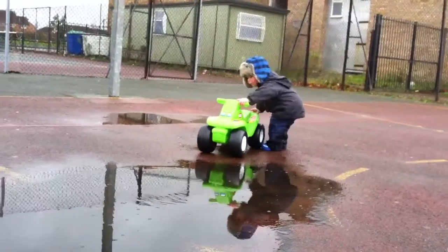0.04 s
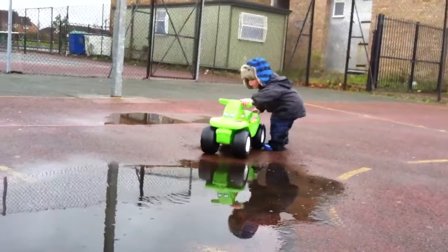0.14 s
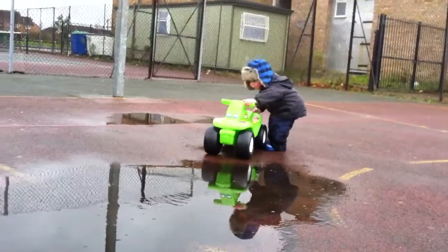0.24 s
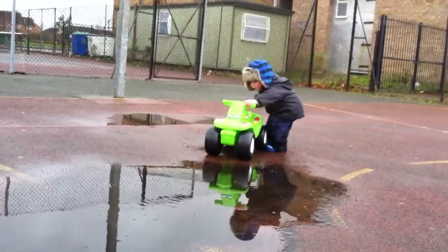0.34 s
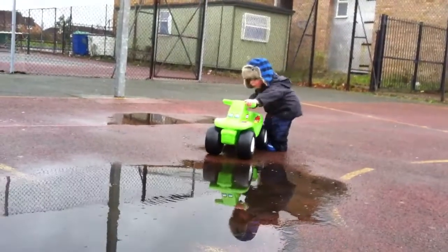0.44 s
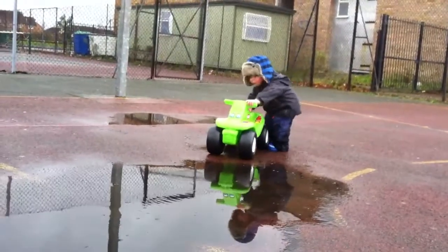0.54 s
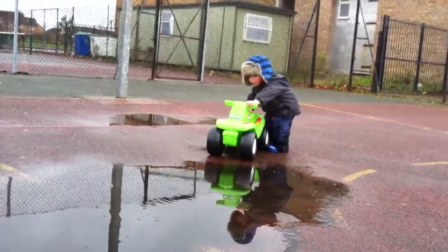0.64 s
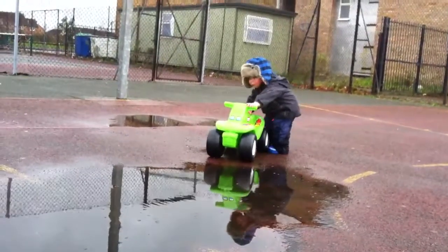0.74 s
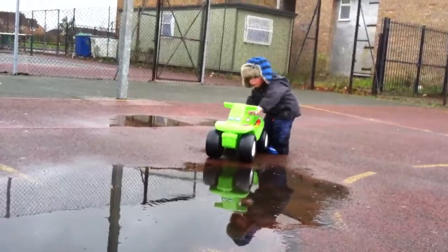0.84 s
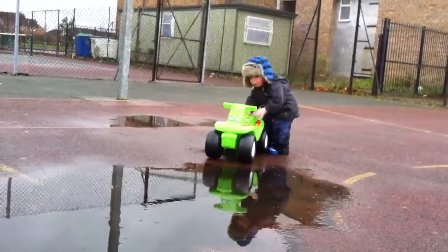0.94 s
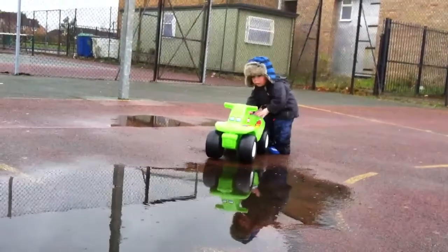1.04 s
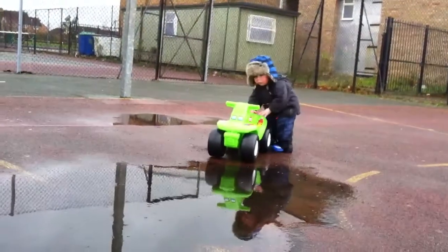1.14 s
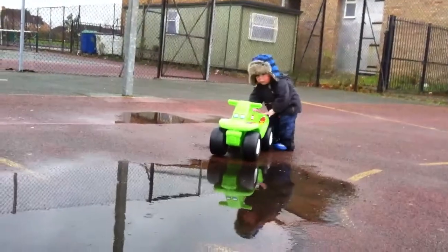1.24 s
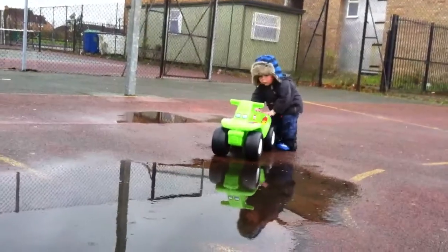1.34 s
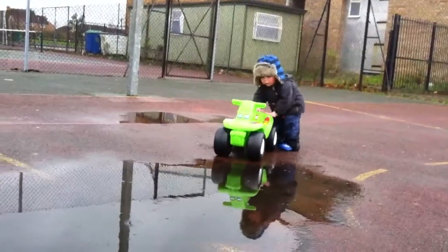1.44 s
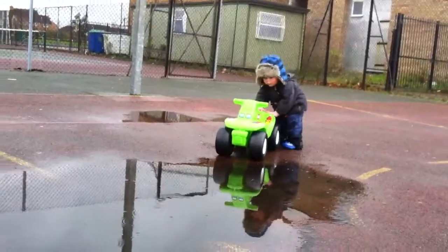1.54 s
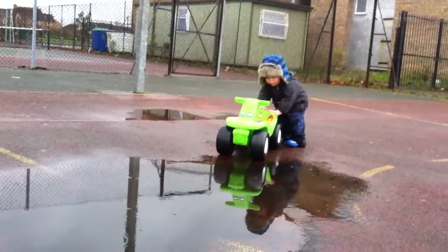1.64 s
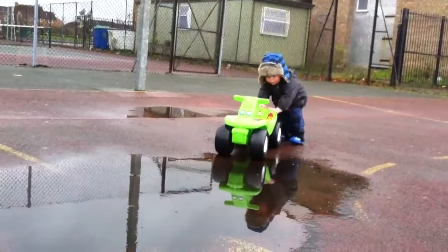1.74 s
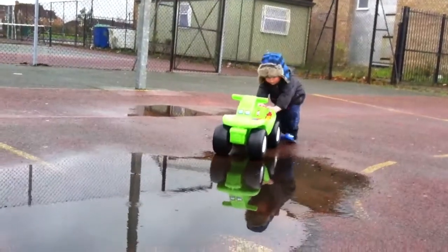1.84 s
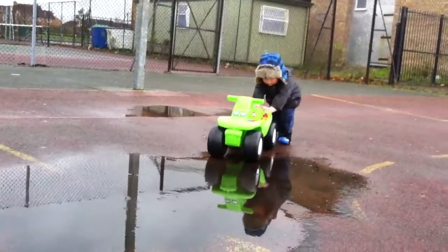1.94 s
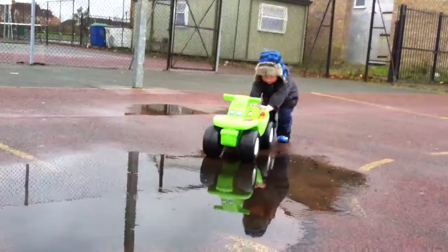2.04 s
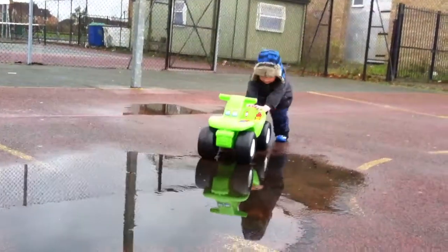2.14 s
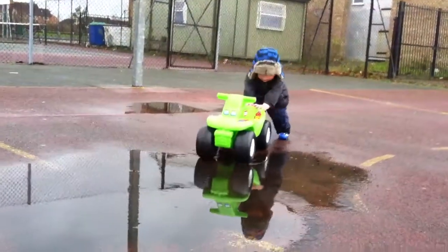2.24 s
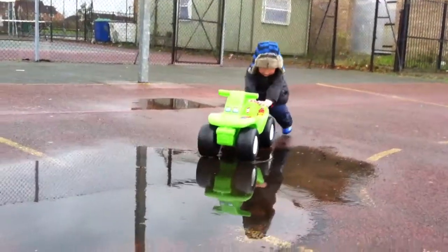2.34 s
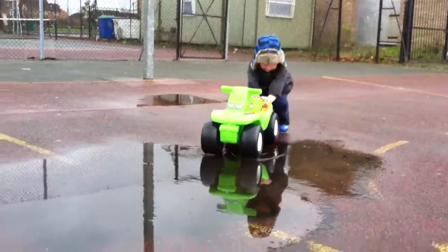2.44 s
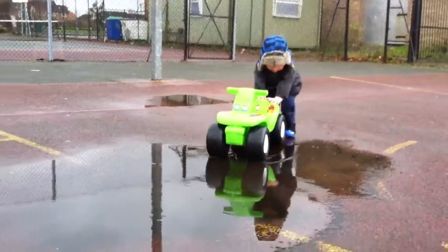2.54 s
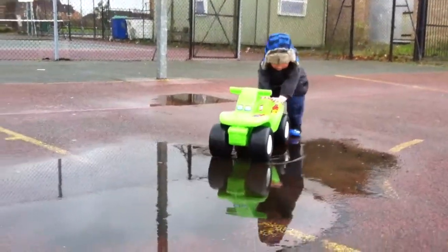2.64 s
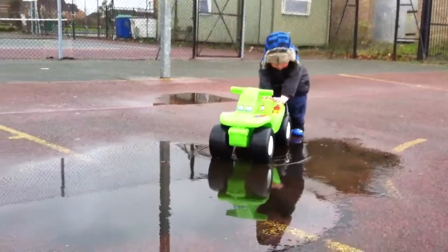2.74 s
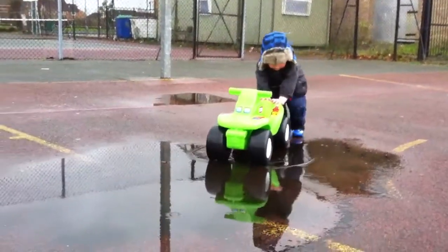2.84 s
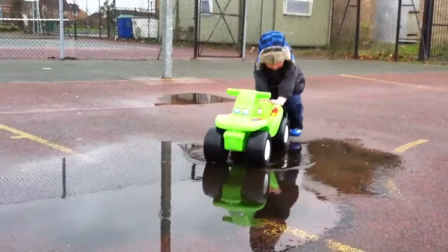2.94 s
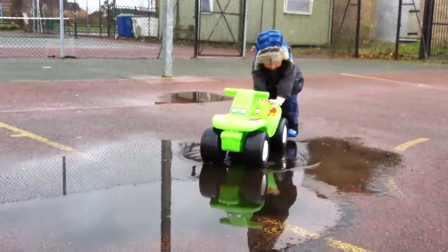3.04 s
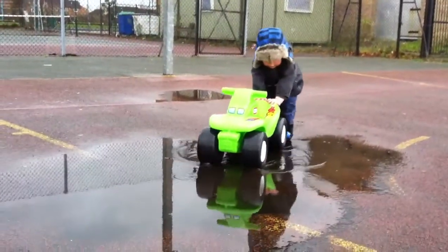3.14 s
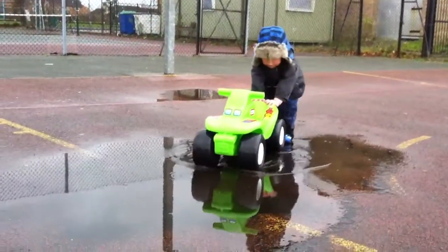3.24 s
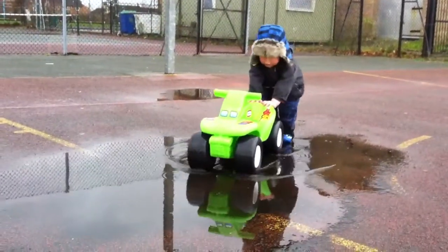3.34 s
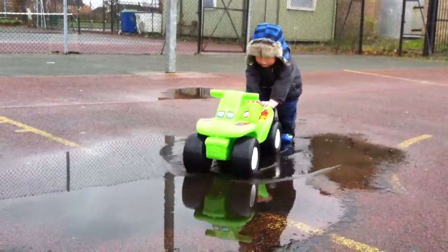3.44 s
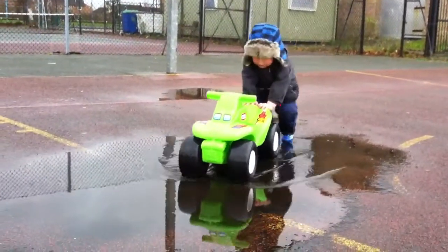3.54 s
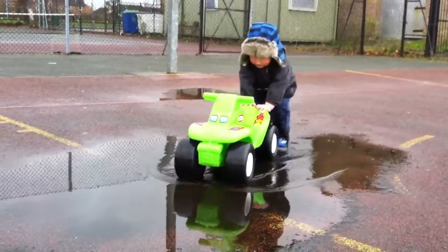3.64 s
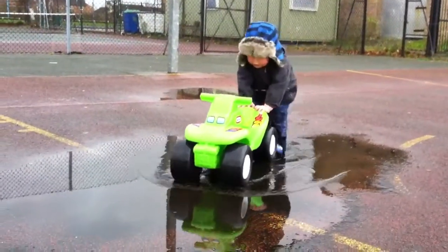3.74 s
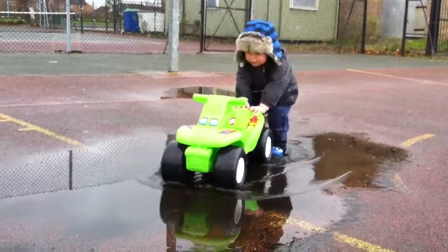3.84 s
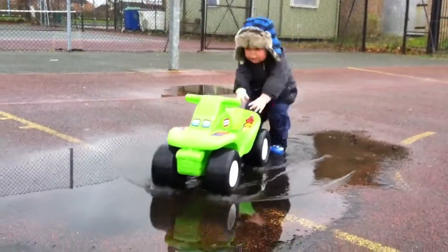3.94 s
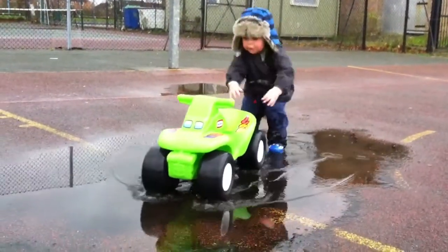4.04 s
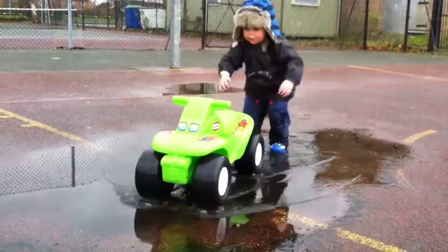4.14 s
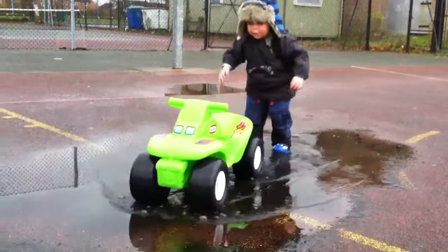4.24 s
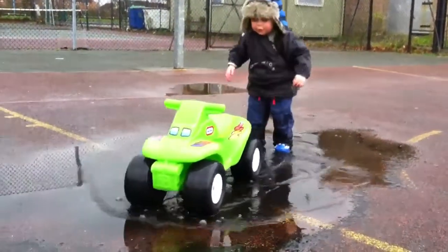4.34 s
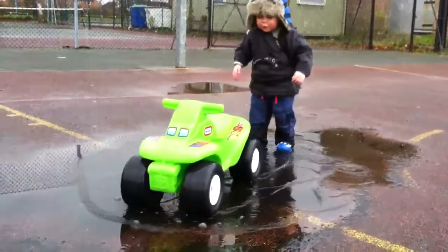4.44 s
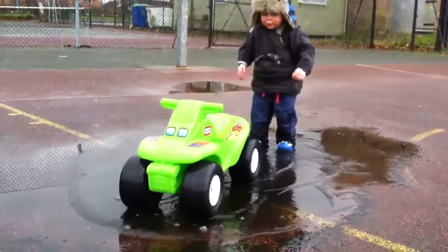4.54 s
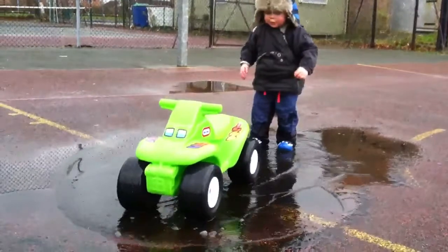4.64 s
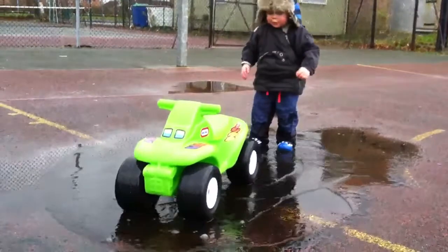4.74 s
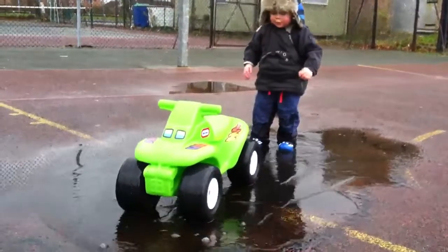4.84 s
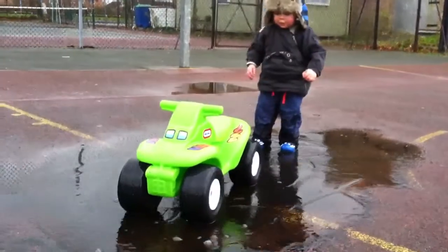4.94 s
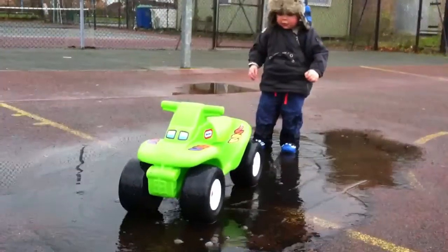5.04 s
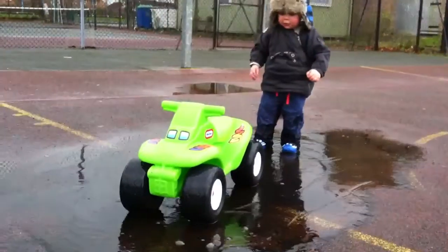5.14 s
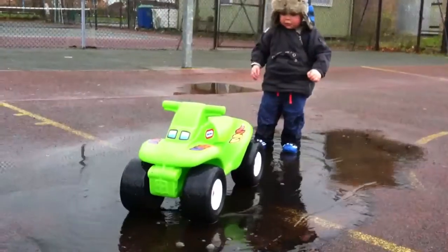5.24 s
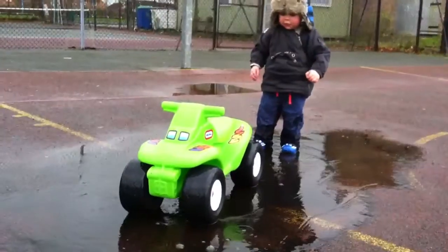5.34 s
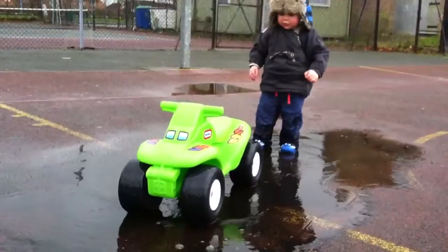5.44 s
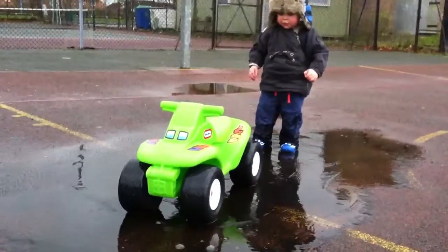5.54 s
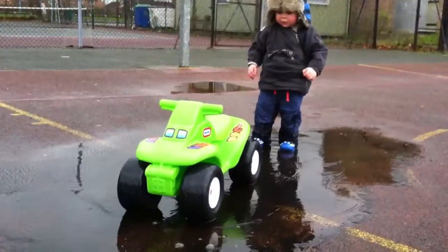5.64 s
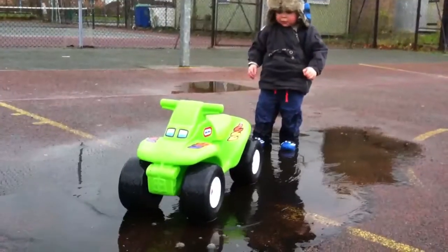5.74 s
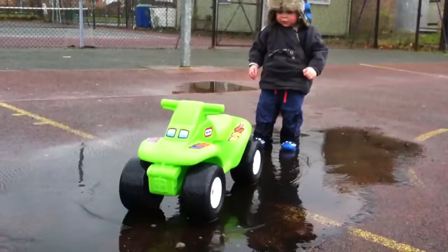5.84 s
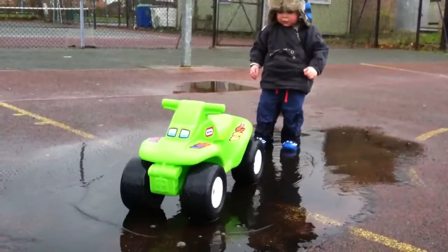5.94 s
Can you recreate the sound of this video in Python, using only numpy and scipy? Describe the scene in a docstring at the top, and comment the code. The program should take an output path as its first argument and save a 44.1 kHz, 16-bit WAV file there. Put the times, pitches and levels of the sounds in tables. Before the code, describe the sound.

On an open outdoor court, a hollow plastic ride-on toy gets a brief rattling shove, then nearly stops with faint gritty scrapes. Sharp clacks begin a longer push, drumming and knocking louder on wet ground into a shallow puddle, with fizz and a few plops. It stops, leaving far traffic. Light wind bumps the microphone.

```python
"""Hard wheels of a hollow plastic ride-on toy drum on wet tarmac as a child pushes it into a shallow puddle.
Random grains drive everything that rolls: they ring resonances of body, air and panels, and crunch as wet grit.
Loose axles clack and the shell knocks, as flurries of contacts and decaying modes; the puddle is rising bubbles.
Light wind bumps the microphone as low swings; far traffic and a faint bird are filtered noise."""
import sys
import numpy as np
from scipy import signal
from scipy.fft import rfft, irfft, next_fast_len
from scipy.io import wavfile

SR = 44100
rng = np.random.default_rng(int(sys.argv[2]) if len(sys.argv) > 2 else 0)


def file_out(sig):
    """Save sig as 16-bit WAV at sys.argv[1]."""
    # one column per channel
    cols = np.atleast_2d(sig).T
    # limit, then scale
    lim = np.clip(cols, -1, 1)
    pcm = np.round(lim * 32767).astype(np.int16)
    wavfile.write(sys.argv[1], SR, pcm)


N = 264159
T = np.arange(N) / SR

# plastic shell resonances: [centre_hz, width_hz, level_db]
BODY_MODES = [(300, 330, -10), (408.7, 39.5, 5), (469, 43, -2), (610, 28.4, 2.5), (676, 63, -0.5),
              (914, 86, -9.5), (1153, 530, -18.5), (1240, 110, -19), (1623, 32, -14.5), (1660, 690, -17),
              (2243, 25, -13)]
# resonances of the air inside: [centre_hz, width_hz, level_db]
CAVITY_MODES = [(163, 27.7, 2.8), (254, 28, 6.5), (307.3, 26, 1.9)]
# panel resonances: [centre_hz, width_hz, level_db]
PANEL_MODES = [(1110, 260, -15), (1580, 36, 7), (1770, 55, -1.5), (2010, 90, -1.5), (2220, 90, -2),
               (2560, 110, -6), (2921, 45, -7), (3220, 170, -2), (3700, 70, -9), (4040, 150, -4),
               (4680, 100, -11), (5140, 60, -5), (7000, 70, -15)]
# grit spectrum, relative: [freq_hz, density_db]
GRIT_SPECTRUM = [(600, -40), (1500, 27.5), (2500, -18.5), (4000, 7), (7000, 10), (10000, 11.5), (16000, -1)]
# stiff wall at the moment of a blow, relative spectrum: [freq_hz, density_db]
CRACK_SPECTRUM = [(450, -18.5), (900, 6), (1500, 2), (2200, -2.5), (3200, -16), (8000, -29)]
# water stirred in the puddle: [time_s, level_db]
WADING_CURVE = [(2.4, -65), (3.0, -65.5), (3.6, -67.5), (4.0, -59), (4.11, -56), (4.2, -54.5), (4.28, -60),
                (4.45, -60.5), (4.7, -63.5)]
# breeze strength: [time_s, level_db]
BREEZE_CURVE = [(0.0, -68), (0.57, -67.5), (1.5, -73), (1.75, -53.5), (1.95, -55.5), (2.42, -43.5),
                (2.78, -50.5), (3.17, -52.5), (3.69, -43), (3.9, -48.5), (4.06, -38), (4.15, -45),
                (4.65, -56), (5.15, -61), (5.37, -58), (5.68, -64.5), (5.84, -55), (5.99, -53)]


def from_db(db):
    """Decibels to amplitude gain."""
    return 10 ** (np.asarray(db) / 20)


def rms_one(x):
    """Scale to an rms of one."""
    return x / np.sqrt(np.mean(x ** 2) + 1e-20)


def level(rows):
    """A (time_s, level_db) curve as a gain in time, fading out beyond its ends."""
    rows = np.array(rows)
    outside_s = np.maximum(rows[0, 0] - T, 0) + np.maximum(T - rows[-1, 0], 0)
    return from_db(np.interp(T, rows[:, 0], rows[:, 1])) * np.exp(-outside_s / 0.027)


def drift(rate_hz):
    """Random values joined by straight lines; rms 1."""
    knots = rng.standard_normal(4096)
    return rms_one(np.interp(T * rate_hz, np.arange(len(knots)), knots))


def clumping(rate_hz, depth_db):
    """A quickly wandering gain with bounded swings; rms 1."""
    return rms_one(from_db(depth_db * np.clip(drift(rate_hz), -2, 1.5)))


def grains(per_s, spread_db):
    """Tiny contacts at random moments, of very uneven size; rms 1."""
    sizes = from_db(spread_db * np.minimum(rng.exponential(1, N), 4)) * rng.choice([-1, 1], N)
    return rms_one(sizes * (rng.random(N) < per_s / SR))


def moments(per_s, count=200):
    """Irregular times that follow a changing rate."""
    due = np.cumsum(per_s * np.ones(N)) / SR
    turns = np.arange(count) + rng.random(count)
    return np.interp(turns[turns < due[-1]], due, T)


def colour(x, spectrum):
    """Causal minimum-phase filter with the given spectrum; white noise keeps its power."""
    hz, db = np.transpose(spectrum)
    size = 2 * next_fast_len(N // 2 + 4096)
    bins_hz = np.arange(size // 2 + 1) * SR / size
    gain = rms_one(from_db(np.interp(np.log(bins_hz + 1), np.log(hz), db)))
    # fold the cepstrum to its causal half
    cepstrum = irfft(np.log(gain))
    cepstrum[1:size // 2] *= 2
    cepstrum[size // 2 + 1:] = 0
    return irfft(rfft(x, size) * np.exp(rfft(cepstrum)))[:N]


def band(x, hz, width_hz):
    """One two-pole resonance, gain one at its top."""
    r = np.exp(-np.pi * width_hz / SR)
    feedback = [1, -2 * r * np.cos(2 * np.pi * hz / SR), r * r]
    return signal.lfilter(np.array([1, 0, -1]) * (1 - r * r) / 2, feedback, x + 1e-18)


def resonate(x, modes, vary_db):
    """Parallel resonances whose shares shift with the point of contact; white noise keeps its power."""
    out = np.zeros(N)
    for k, (hz, width_hz, db) in enumerate(modes):
        share = from_db(db + vary_db * drift(25))
        out += band(x * share, hz, width_hz) * (-1) ** k
    power = sum(from_db(db) ** 2 * np.pi * width_hz / SR for hz, width_hz, db in modes)
    return out / np.sqrt(power)


def soften(x, hz, kind):
    """A gentle second-order low-pass or high-pass."""
    return signal.sosfilt(signal.butter(2, hz, kind, fs=SR, output="sos"), x + 1e-18)


def add(out, start_s, sound):
    """Mix a sound in at its start time."""
    start = int(np.clip(start_s * SR, 0, N - 1))
    out[start:start + len(sound)] += sound[:N - start]


def chatter(contacts, start_s, decay_s, rise_s, hardest):
    """Hard parts bounce in a dying flurry; the hardest contact takes a share of the energy."""
    t = T[:SR // 10]
    envelope = (1 - np.exp(-t / rise_s)) * np.exp(-t / decay_s)
    excerpt = np.roll(contacts, -int(start_s * SR))[:len(t)]
    flurry = np.sqrt(1 - hardest) * rms_one(excerpt * envelope)
    flurry[int(2 * rise_s * SR)] += np.sqrt(hardest * len(t))
    return flurry * np.sqrt(np.mean(envelope ** 2))


def speed():
    """Wheel speed as the gain of the drumming: a shove, then a long push."""
    # drumming in the shove: [time_s, level_db]
    shove = [(0.0, -58.5), (0.055, -63.5), (0.08, -56), (0.202, -56), (0.38, -61)]
    # drumming in the long push: [time_s, level_db]
    long_push = [(1.65, -59), (1.95, -56), (2.29, -53.5), (2.39, -52), (2.65, -57), (3.14, -57.5),
                 (3.54, -52.5), (3.77, -55), (4.06, -47.5), (4.2, -48.5), (4.32, -50), (4.42, -61),
                 (4.49, -51.5), (4.6, -64.5)]
    return level(shove) + level(long_push)


def bare_ground():
    """Gain of the grit: deeper water cushions the tread and hushes it."""
    puddle_s, cushion_db = 3.1, -8
    return from_db(np.interp(T, [puddle_s, puddle_s + 0.11], [0, cushion_db]))


def rolling(body_db=1.5, boom_db=0.5, tread_db=-2, panel_db=-9, crunch_db=-9, crunch_s=0.0022):
    """Stones drum on the hollow body, each with a small crunch; grit crackles and shakes the panels."""
    grit_db, grit_follows = -45.5, 0.68  # grit follows the drumming to this power
    drumming = speed()
    stones = drumming * grains(per_s=700, spread_db=4.5) * clumping(rate_hz=50, depth_db=2.5)
    grit_gain = from_db(grit_db) * drumming ** grit_follows * bare_ground()
    grit = grit_gain * grains(per_s=3500, spread_db=2.5) * clumping(rate_hz=80, depth_db=5)
    # each stone opens a short burst of crunch
    keep = np.exp(-1 / (crunch_s * SR))
    crushing = np.sqrt(signal.lfilter([1 - keep], [1, -keep], stones ** 2 + 1e-18))
    crunch = colour(crushing * bare_ground() * grains(per_s=2500, spread_db=3), CRACK_SPECTRUM)
    body = from_db(body_db) * resonate(stones, BODY_MODES, vary_db=2.0)
    boom = from_db(boom_db) * resonate(stones, CAVITY_MODES, vary_db=4.0)
    tread = from_db(tread_db) * colour(grit, GRIT_SPECTRUM) + from_db(crunch_db) * crunch
    return body + boom + tread + from_db(panel_db) * resonate(grit, PANEL_MODES, vary_db=-2.5)


def skidding():
    """Each skid bites quickly, holds and dies away; returns gains for grit and for shaken panels."""
    # wheels skid sideways as the toy is steered: [start_s, length_s, grit_level_db, panel_relative_db]
    skids = [(0.189, 0.17, -57, -4.5), (0.731, 0.061, -61.5, -2), (0.873, 0.11, -67.5, -2),
             (1.628, 0.15, -74, 3), (1.781, 0.028, -56, 9.5), (1.844, 0.093, -63, 1),
             (3.466, 0.078, -63, -2), (3.835, 0.012, -49, -8)]
    attack_s, release_s = 0.0047, 0.019
    grit, panels = np.zeros(N), np.zeros(N)
    for start_s, length_s, db, panel_db in skids:
        attack = np.clip((T - start_s) / attack_s, 0, 1)
        release = np.exp(-np.maximum(T - start_s - length_s, 0) / release_s)
        bite = from_db(db) * attack * release
        grit += bite
        panels += from_db(panel_db) * bite
    return grit, panels


def scraping(grit_db=-2, body_db=1, crack_db=-5):
    """A skidding tread sticks and slips over stones in ragged bursts that shake panels and body."""
    skids, skid_panels = skidding()
    slips = grains(per_s=3500, spread_db=2.5) * clumping(rate_hz=170, depth_db=3)
    scrape = slips * skids
    body = from_db(body_db) * resonate(scrape, BODY_MODES, vary_db=1.0)
    crack = from_db(crack_db) * colour(scrape, CRACK_SPECTRUM)
    grit = from_db(grit_db) * colour(scrape, GRIT_SPECTRUM)
    return body + crack + grit + resonate(slips * skid_panels, PANEL_MODES, vary_db=2.5)


def wheel_hum(hum_db=-2.5, hum_hz=655, width_hz=36, detune_ratio=0.053, count=3):
    """Hollow wheels ring as they turn, a little apart in pitch, each swelling by chance."""
    rings = np.zeros(N)
    for k in np.linspace(-1, 1, count):
        ring = band(grains(per_s=700, spread_db=3.5), hum_hz * (1 + detune_ratio * k), width_hz)
        rings += ring * clumping(rate_hz=14, depth_db=2.5)
    return from_db(hum_db) * speed() * rms_one(rings)


def crackle(crackle_db=-12, lowest_hz=800, highest_hz=5500, cycles=8.4, slope_db_per_octave=-3.0, count=16):
    """Single bits of grit snap under the tread, spread over a ladder of pitches."""
    snaps = np.zeros(N)
    for hz in np.geomspace(lowest_hz, highest_hz, count):
        ringing = band(grains(per_s=45, spread_db=3.5), hz, hz / (np.pi * cycles))
        snaps += from_db(slope_db_per_octave * np.log2(hz / lowest_hz)) * rms_one(ringing)
    return from_db(crackle_db) * speed() * rms_one(snaps)


def wet_tread(fizz_db=-12, lowest_hz=2400, highest_hz=13000, slope_db_per_octave=1.0, spray_db=-5, count=14):
    """The water film tears off the tread in tiny pitched snaps; in the puddle the wheels throw fine spray."""
    # water thrown off the treads, relative spectrum: [freq_hz, density_db]
    spray_spectrum = [(600, -6), (1300, 6), (2500, -4), (5000, -9.5), (9000, -10), (16000, -12.5)]
    snaps = np.zeros(N)
    for hz in np.geomspace(lowest_hz, highest_hz, count):
        ringing = band(grains(per_s=70, spread_db=4), hz, hz / 12)
        snaps += from_db(slope_db_per_octave * np.log2(hz / lowest_hz)) * rms_one(ringing)
    spray = colour(grains(per_s=5000, spread_db=2.5) * clumping(rate_hz=60, depth_db=2), spray_spectrum)
    fizz = from_db(fizz_db) * speed() * bare_ground() * rms_one(snaps)
    return fizz + from_db(spray_db) * level(WADING_CURVE) * spray


def rattles(count=200):
    """Light clacks shaken out by chance, more often at speed, in the columns of the clack table."""
    full_speed_per_s = 26
    mean_db = np.array([-51.5, -10, -2.5])  # strength, panel ring, treble
    spread_db = np.array([3, 4, 3])
    pace = np.sqrt(speed() / speed().max()) * bare_ground() ** 2
    kinds = mean_db + spread_db * rng.standard_normal(size=(count, 3))
    return [(s, *kind) for s, kind in zip(moments(full_speed_per_s * pace), kinds)]


def clacks(tick_db=-9, treble_db=9, split_hz=11500, small_db=1, settle_db=-19, settle_s=0.014):
    """Loose plastic parts chatter and settle: a bright tick, small modes of their own, and panel ring."""
    # loose wheels and axles clacking: [start_s, level_db, panel_relative_db, treble_relative_db]
    clack_events = [(0.0601, -33, -4, -26), (0.166, -34, -27, -26), (0.139, -37.5, -12, -18),
                    (0.197, -36.5, -8, -14), (0.225, -42, -3, -18), (0.317, -37, -9.5, -16),
                    (0.359, -34, -14, -9), (0.37, -37.5, -12, -6), (0.6136, -43, -14, -25),
                    (0.783, -42, -7, -2), (0.911, -46.5, -7, -7), (1.196, -48, -4.5, -21),
                    (1.229, -47, -5, -26), (1.629, -27, -6, -28), (1.635, -25.5, -13, -28),
                    (1.653, -51, 7, -22), (1.693, -31.5, -18, -20), (1.722, -30.5, -10, -20),
                    (1.75, -36.5, -3, -24), (1.7707, -24, -3.5, -39), (1.8, -42, 2, -25),
                    (1.855, -39, -10, -20), (1.887, -34.5, -2, -30), (1.928, -37.5, -8, -20),
                    (1.978, -52, -8, -24), (2.045, -41, -4, -12), (2.066, -41, 0, -20),
                    (2.0745, -24.5, -12, -3.5), (2.154, -42.5, 0.5, -22), (2.2184, -31.5, -14, -18),
                    (2.297, -38.5, -9, -10), (2.3182, -35.5, -8.5, -7), (2.341, -45, -2, -20),
                    (2.419, -64, 1, -20), (2.485, -36.5, -17, -9), (2.545, -39.5, -13, -14),
                    (2.63, -30, -9, -25), (2.655, -28, -27, -18), (2.677, -36, -16, -14),
                    (2.8415, -25.5, -6.5, -1.5), (2.887, -32, -7.5, -10), (3.008, -36, -12, -11),
                    (3.042, -31.5, -10.5, -2), (3.0827, -32, -10.5, -7), (3.137, -32.5, -24, -6),
                    (3.185, -29.5, -13.5, -26), (3.413, -38.5, -22, -14), (3.459, -43, -6, -22),
                    (3.468, -30.5, -12.5, -27), (3.583, -35, -9.5, -9), (3.6437, -27.5, -14.5, -8),
                    (3.709, -59, -1, -24), (3.826, -42, -21, -21), (3.84, -41, 0, -24),
                    (3.8972, -19, -24, -12), (3.903, -29, -33, -15), (3.94, -28, -9, -14),
                    (3.978, -34, -10, -14), (4.0344, -19, -17, -23), (4.039, -28, -5.5, -3),
                    (4.336, -35.5, -9, -12), (4.371, -45.5, -4, -20), (4.438, -40.5, -7, -11),
                    (4.479, -47, -6, -20), (4.545, -35, -5, -5), (4.562, -46, -8, -20),
                    (4.647, -40, -8.5, -15), (4.811, -46, -5, -7), (4.85, -39.5, -7, -8)]
    # tick spectrum, relative: [freq_hz, density_db]
    tick_spectrum = [(500, -18), (1000, 2), (1500, 0), (2500, 4.5), (3300, 0), (5000, 6.5), (7000, 6),
                     (9500, 3.5), (12500, 6.5), (16000, 4.5)]
    rise_s, decay_s, hardest = 0.0018, 0.0048, 0.25  # hardest: largest energy share of one contact
    small_hz, small_octaves, small_width_hz = 2682, 1.9, 190  # lowest small mode, range above it
    contacts = grains(per_s=7000, spread_db=3.0)
    ticks, treble, blows = np.zeros(N), np.zeros(N), np.zeros(N)
    chances = rng.random(size=(250, 10))
    for (s, db, panel_db, bright_db), (firmness, *sizes) in zip(clack_events + rattles(), chances):
        hit = chatter(contacts, s, decay_s, rise_s, hardest * firmness)
        settling = chatter(contacts[::-1], s, settle_s, rise_s, hardest=0)
        flurry = from_db(db) * (hit + from_db(settle_db) * settling)
        small = sum(band(flurry, small_hz * 2 ** (small_octaves * size), small_width_hz) for size in sizes)
        tick = flurry + from_db(small_db) * small
        add(ticks, s, tick)
        add(treble, s, from_db(bright_db + treble_db) * tick)  # harder contacts reach higher
        add(blows, s, from_db(panel_db) * flurry)
    low = signal.butter(3, split_hz, "low", fs=SR, output="sos")
    high = signal.butter(3, split_hz, "high", fs=SR, output="sos")
    ticking = colour(signal.sosfilt(low, ticks) + signal.sosfilt(high, treble), tick_spectrum)
    return from_db(tick_db) * ticking + resonate(blows, PANEL_MODES, vary_db=-2.5)


def pings(decay_s=0.0048):
    """One panel struck squarely rings on its own as a decaying sine."""
    # struck panels: [start_s, level_db, pitch_hz]
    ping_events = [(1.637, -43, 2030), (1.774, -28.5, 1604), (1.807, -35, 1620), (2.026, -45, 1540),
                   (2.077, -33.5, 2190), (3.901, -33, 7150), (3.902, -30, 9900)]
    out, t = np.zeros(N), T[:SR // 10]
    for start_s, db, hz in ping_events:
        add(out, start_s, from_db(db) * np.sin(2 * np.pi * hz * t) * np.exp(-t / decay_s))
    return out


def knocks(body_db=-6, boom_db=-2, mode_db=2, mode_rise_s=0.0016, mode_decay_s=0.0042, soft_hz=1000):
    """Jolts crack on the wall and ring body and inner air; the leading mode depends on where the blow lands."""
    # hollow body jolted: [start_s, level_db, boom_relative_db, leading_mode_hz, crack_relative_db, bounce_decay_s]
    knock_events = [(0.0615, -23.5, -10, 677, -16, 0.0063), (0.07, -35, 9, 428, -24, 0.0056),
                    (0.09, -35, -1.5, 610, -15, 0.012), (0.103, -43, -6, 680, -16, 0.004),
                    (0.157, -34.5, -18, 620, -10, 0.0038), (0.199, -43.5, -4, 690, -13, .008),
                    (0.215, -31, -14, 600, -15, 0.01), (0.277, -46, -8, 690, -4, 0.008),
                    (0.329, -37, -11, 632, -31, 0.01), (0.617, -38, -3, 490, -16, 0.0065),
                    (1.819, -39, -12, 680, -8, .011), (1.89, -52, -3.5, 710, 8, 0.006),
                    (1.993, -43, 1, 554, -13, 0.0085), (2.085, -35.5, 1, 586, -13, 0.015),
                    (2.203, -36.5, -14, 690, -19, 0.0098), (2.272, -38, -5, 564, -27, 0.0052),
                    (2.301, -35, -6, 770, -10, .007), (2.318, -37, -3, 637, -17, .008),
                    (2.362, -39.5, 3, 625, -7, .008), (2.396, -33, -9, 690, -20, 0.0068),
                    (2.418, -39, 5, 590, -10, 0.0099), (2.445, -40.5, -7, 610, -12, .005),
                    (2.633, -44, -4, 666, -3, 0.0074), (2.735, -32, -1, 614, -12, .006),
                    (2.794, -43.5, -8, 704, -6.5, 0.0077), (2.845, -32, -18, 686, -19, 0.01),
                    (2.893, -37, -9, 654, -9, 0.02), (2.922, -36.5, -7, 654, -21, 0.0061),
                    (3.039, -49, -1, 600, -14, 0.0068), (3.11, -43.5, -18, 650, -17, 0.0065),
                    (3.142, -33, -15, 640, -12, 0.0053), (3.187, -37.5, -4, 650, -18, 0.0064),
                    (3.199, -38.5, 0.5, 636, -14, .011), (3.366, -33.5, -10, 660, -23, 0.0066),
                    (3.402, -37.5, -9, 650, -15, .008), (3.459, -34, -13, 650, -8, 0.012),
                    (3.497, -35, 0, 630, -17, 0.013), (3.542, -31.5, -3, 640, -23, 0.0062),
                    (3.584, -37, 0, 660, -17, 0.0053), (3.638, -35, 3, 624, -12, .008),
                    (3.711, -30.5, -12, 590, -11.5, 0.0078), (3.725, -32, -5, 710, -29, 0.0039),
                    (3.78, -45, -2, 640, -13, 0.0043), (3.843, -36, -6, 670, -6, 0.011),
                    (3.861, -32, -9, 607, -16, 0.008), (3.93, -30.5, -9, 627, -15.5, 0.014),
                    (3.968, -35.5, 6.5, 600, -13.5, 0.022), (4.005, -26.5, -22, 520, -23, 0.0074),
                    (4.021, -38.5, 3, 700, -6, 0.015), (4.046, -35, 3, 550, -10, 0.012),
                    (4.067, -36, 5.5, 596, -23, 0.0056), (4.085, -24, -10, 617, -23, 0.0022),
                    (4.123, -24, -16, 688, -26, 0.0029), (4.131, -24.5, -19, 537, -15, 0.0071),
                    (4.19, -34.5, -7, 487, -23, 0.0064), (4.258, -30, -22, 574, -26, 0.0055),
                    (4.34, -41, -7, 644, -8, .007), (4.374, -35.5, 1, 720, -17, 0.0058),
                    (4.441, -35, -1.5, 620, -16, 0.014), (4.547, -40.5, 1, 473, -8, 0.0062),
                    (4.652, -31, -5, 530, -17, 0.0063)]
    rise_s, hardest = 0.0006, 0.2  # hardest: energy share of one contact
    contacts = grains(per_s=1800, spread_db=2.5)
    jolts, booms, cracks, leading = np.zeros(N), np.zeros(N), np.zeros(N), np.zeros(N)
    t = T[:SR // 10]
    mode_envelope = (1 - np.exp(-t / mode_rise_s)) * np.exp(-t / mode_decay_s)
    for s, db, cavity_db, hz, wall_db, decay_s in knock_events:
        flurry = from_db(db) * chatter(contacts, s, decay_s, rise_s, hardest)
        add(jolts, s, flurry)
        add(booms, s, from_db(cavity_db) * flurry)
        add(cracks, s, from_db(wall_db) * flurry)
        add(leading, s, from_db(db + mode_db) * np.sin(2 * np.pi * hz * t) * mode_envelope)
    body = from_db(body_db) * resonate(soften(jolts, soft_hz, "low"), BODY_MODES, vary_db=4.0)
    boom = from_db(boom_db) * resonate(booms, CAVITY_MODES, vary_db=3.5)
    return leading + body + colour(cracks, CRACK_SPECTRUM) + boom


def bubble(hz, cycles, climb_per_s=2.7):
    """A trapped air bubble swells, rings for a few cycles and rises in pitch."""
    t = T[:SR // 15]
    ring = np.sin(2 * np.pi * hz * t * (1 + climb_per_s * t))  # pitch climbs at twice this rate
    return ring * (1 - np.exp(-t * hz / 2)) * np.exp(-t * hz / cycles)


def puddle(count=700, lowest_hz=560, octaves=2.8, spread_db=18, fading=0.95, plop_db=3):
    """The wheels stir up many short-lived bubbles and a few clear plops."""
    # water plopping under the wheels: [start_s, level_db, pitch_hz, ring_cycles]
    plop_events = [(3.325, -55, 3370, 14), (3.511, -53, 3400, 12), (4.053, -40.5, 1224, 7.6),
                   (4.152, -43, 880, 6.9), (4.173, -31.5, 1310, 4.5), (4.191, -53, 3180, 14),
                   (4.212, -47, 1450, 7.1), (4.242, -49, 2850, 17), (4.259, -42, 1510, 9.8),
                   (4.316, -53, 2910, 11), (4.341, -49, 1620, 7.9), (4.361, -51.5, 6360, 22)]
    small, plops = np.zeros(N), np.zeros(N)
    for when, pitch, size in rng.random((count, 3)):
        hz = lowest_hz * 2 ** (octaves * pitch)
        gain = from_db(spread_db * size) * (lowest_hz / hz) ** fading  # small bubbles are fainter
        add(small, when * T[-1], gain * bubble(hz, cycles=7))
    for start_s, db, hz, cycles in plop_events:
        add(plops, start_s, from_db(db + plop_db) * bubble(hz, cycles))
    return level(WADING_CURVE) * rms_one(small) + plops


def court(x, scatter_db=-17, t60_s=1.0, dull_hz=5000):
    """Dull echoes from the walls and a thin decaying scatter from fences and ground."""
    # echoes round the court: [delay_s, level_db]
    wall_echoes = [(0.046, -35), (.083, -36), (0.13, -34.5)]
    t = T[:SR // 2]
    scatter = rms_one(rng.standard_normal(len(t)) * from_db(-60 * t / t60_s))
    response = from_db(scatter_db) * scatter / np.sqrt(len(t))
    for delay_s, db in wall_echoes:
        response[int(delay_s * SR)] += from_db(db)
    b, a = signal.butter(1, dull_hz, fs=SR)
    return signal.lfilter(b, a, signal.fftconvolve(x, response)[:N])


def eddies(count=200):
    """Small bumps come by chance with the gusts, as strong as the breeze, in the columns of the bump table."""
    strongest_per_s, above_breeze_db, length_s = 22, 13.5, 0.0079
    pitches_hz = 180 * 2 ** (0.35 * rng.uniform(-0.45, 1, count))
    gust = level(BREEZE_CURVE) / level(BREEZE_CURVE).max()
    times_s = moments(strongest_per_s * gust)
    levels_db = above_breeze_db + np.interp(times_s, *np.transpose(BREEZE_CURVE))
    return [(s, db, hz, length_s) for s, db, hz in zip(times_s, levels_db, pitches_hz)]


def wind(breeze_db=-2, bump_db=-1, lumpy_db=2.5, slowing=0.78, low_cut_hz=62):
    """A lumpy low flutter; each larger eddy gives a few swings of pressure that slow as it passes."""
    # strongest wind bumps on the microphone: [start_s, level_db, pitch_at_peak_hz, length_s]
    bump_events = [(0.82, -47, 141, 0.019), (1.392, -41.5, 139, 0.022), (2.356, -31, 142, 0.019),
                   (2.442, -24, 238, 0.01), (2.462, -29.5, 174, 0.0068), (2.574, -28.5, 157, 0.013),
                   (2.612, -32, 155, 0.027), (2.627, -27, 170, 0.026), (2.683, -26.5, 220, 0.0078),
                   (2.694, -33, 196, 0.02), (2.771, -31.5, 177, 0.016), (3.169, -26, 158, 0.014),
                   (3.569, -29, 199, 0.018), (3.641, -31, 194, 0.019), (3.655, -23.5, 171, 0.023),
                   (3.681, -30, 173, 0.023), (3.723, -25.5, 198, 0.018), (3.763, -29, 179, 0.016),
                   (3.796, -19.5, 173, .013), (3.871, -44, 160, 0.014), (4.002, -20, 190, 0.013),
                   (4.085, -39, 259, 0.0076), (4.821, -37, 160, 0.0079), (4.885, -42, 158, 0.011),
                   (5.231, -42, 149, 0.02), (5.323, -39.5, 138, 0.016), (5.415, -39.5, 201, 0.014),
                   (5.813, -37.5, 161, 0.015), (5.842, -39.5, 132, 0.016), (5.929, -32.5, 177, 0.016)]
    # flutter spectrum, relative: [freq_hz, density_db]
    wind_spectrum = [(20, -31), (40, -60), (65, -49), (100, -9), (160, -5), (240, -12.5), (340, -12),
                     (600, -25.5), (1500, -77)]
    flutter = colour(rng.standard_normal(N), wind_spectrum) * from_db(lumpy_db * drift(35))
    out = from_db(breeze_db) * level(BREEZE_CURVE) * rms_one(flutter)
    for (s, db, hz, length_s), phase in zip(bump_events + eddies(), rng.random(size=250)):
        age = T[:SR // 10] / length_s
        turns = phase + np.cumsum(hz * np.exp(-slowing * (age - .5))) / SR
        swell = (2 * age) ** 2 * np.exp(1 - (2 * age) ** 2)  # peaks at half the length
        add(out, s, from_db(db + bump_db) * swell * np.sin(2 * np.pi * turns))
    return soften(out, low_cut_hz, "high")


def surroundings(traffic_db=-56.5, bird_hz=4300, bird_width_hz=380):
    """Far traffic as shaped noise, and a thin bird trill blurred by distance into narrow-band noise."""
    # traffic spectrum, relative: [freq_hz, density_db]
    traffic_spectrum = [(20, -13.5), (35, -50), (55, -18), (80, -12.5), (160, 1), (260, -2), (350, -7),
                        (550, -9), (1150, -9.5), (2100, -19), (3400, -26), (5000, -29.5), (10000, -32),
                        (16000, -32.5)]
    # bird: [time_s, level_db]
    bird_curve = [(.70, -87), (.76, -76), (.95, -70), (1.0, -100), (4.4, -100), (4.48, -76), (4.64, -78),
                  (4.7, -100)]
    trill = rms_one(band(rng.standard_normal(N), bird_hz, bird_width_hz))
    traffic = from_db(traffic_db) * colour(rng.standard_normal(N), traffic_spectrum)
    return traffic + level(bird_curve) * trill


def scene():
    """The toy on the open court, with wind and background."""
    toy = rolling() + scraping() + wheel_hum() + crackle() + wet_tread()
    toy = toy + clacks() + pings() + knocks() + puddle()
    return (toy + court(toy) + wind() + surroundings())[None]


def record(dry):
    """The top is cut steeply by an elliptic low-pass."""
    cutoff_hz = 15750
    return signal.sosfilt(signal.ellip(12, .1, 80, cutoff_hz, fs=SR, output="sos"), dry)


dry = scene()
out = record(dry)
file_out(out)
```